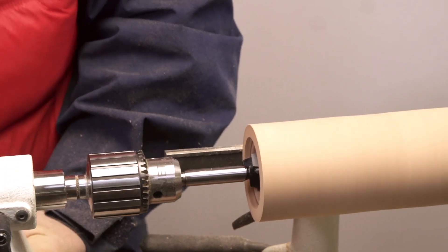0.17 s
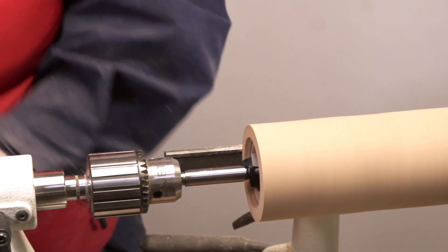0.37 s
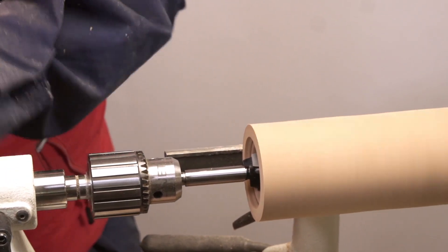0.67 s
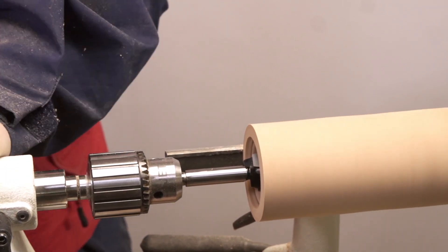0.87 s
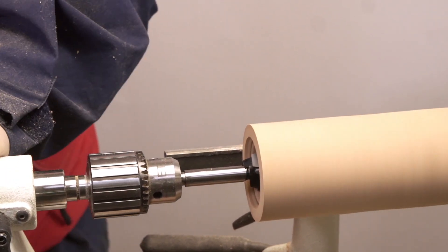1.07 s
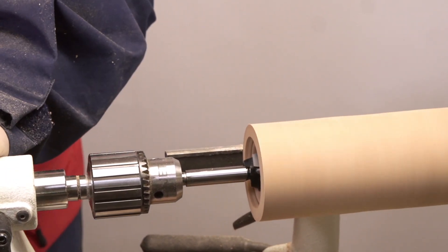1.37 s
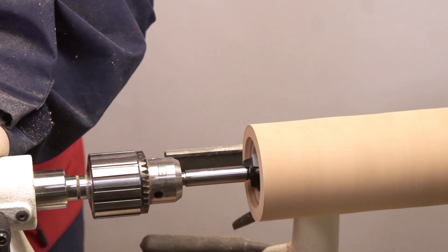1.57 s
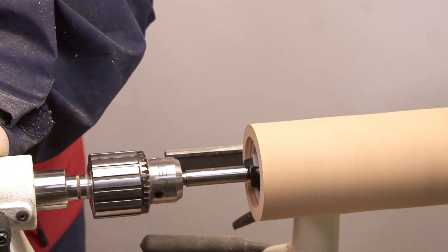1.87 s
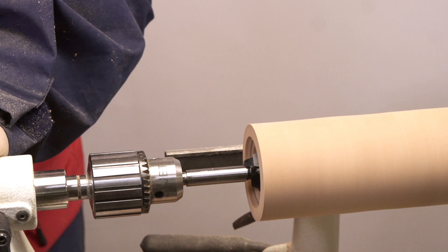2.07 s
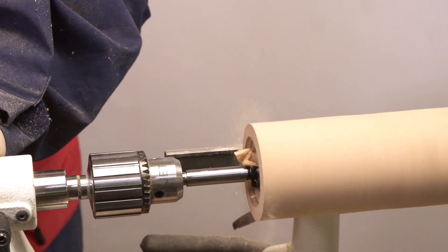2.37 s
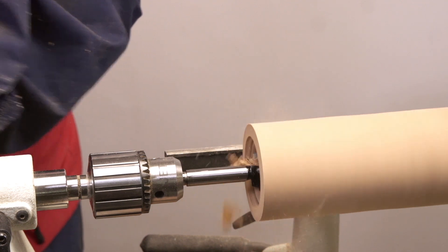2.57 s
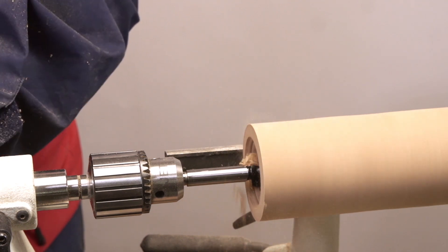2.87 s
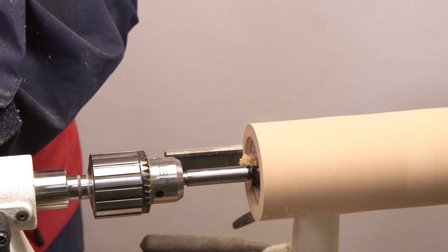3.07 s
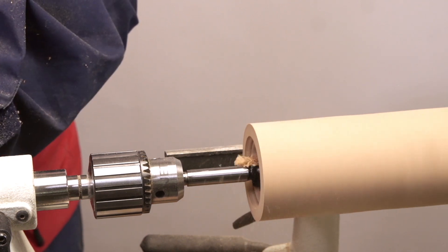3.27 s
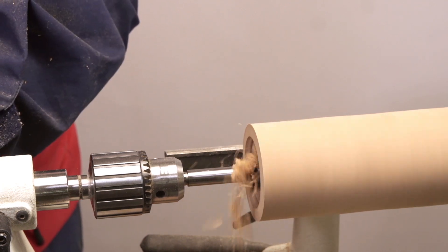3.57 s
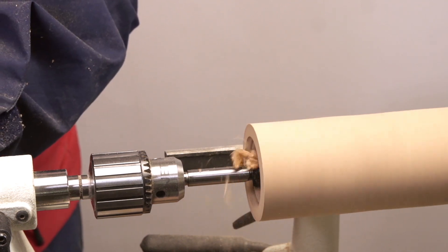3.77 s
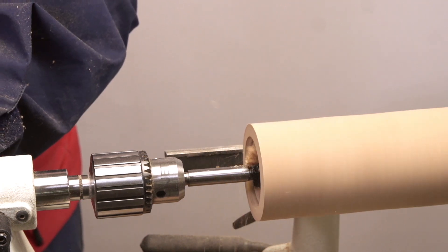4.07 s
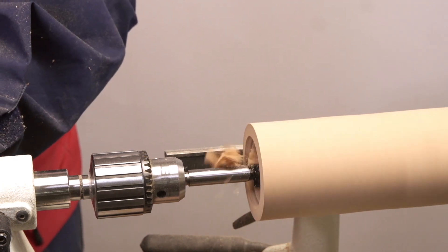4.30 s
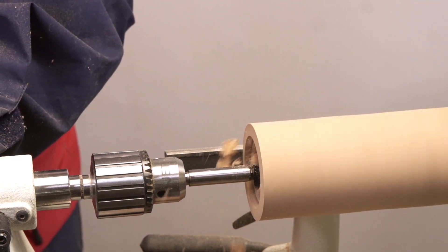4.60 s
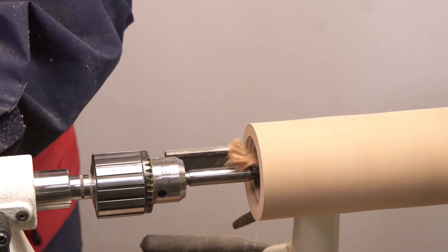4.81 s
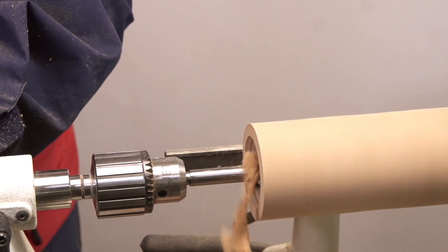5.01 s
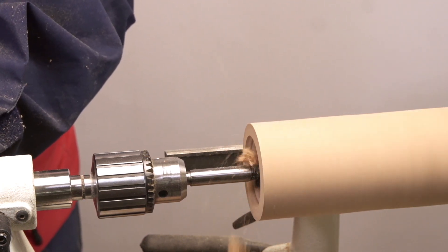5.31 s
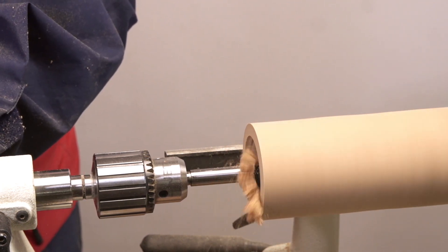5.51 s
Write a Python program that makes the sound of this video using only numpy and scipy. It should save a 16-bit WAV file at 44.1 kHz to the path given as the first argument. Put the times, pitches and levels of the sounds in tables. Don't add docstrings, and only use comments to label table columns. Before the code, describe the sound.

In a workshop, close up and dry, a lathe abruptly appears, idling with a faint pulsing hiss and low shake. Light knocks and a quick sleeve rub follow. Then a boring bit grazes the spinning wood in irregular steely ticks and scrapes, growing denser. It bites: a loud harsh whine, wooden rumble, snapping fibres and squeaks repeat with each turn, until the wood sings and groans. The camera microphone gives clipped highs.

```python
import sys
import numpy as np
from scipy import signal
from scipy.io import wavfile
from scipy.ndimage import uniform_filter1d, map_coordinates

SR = 44100
rng = np.random.default_rng(int(sys.argv[2]) if len(sys.argv) > 2 else 0)


def materialize(psi):
    bounded = np.clip(np.atleast_2d(psi).T, -1, 1)
    quanta = np.round(bounded * 32767).astype(np.int16)
    wavfile.write(sys.argv[1], SR, quanta)


def undo_db(level):
    steps = np.asarray(level, float) / 20
    return 10 ** steps


N = 249165
T = np.arange(N) / SR
HZ = np.fft.rfftfreq(N, 1 / SR)


def evened(x):
    return x / np.sqrt(np.mean(x ** 2) + 1e-20)


def steady(x, size=6000):
    power = uniform_filter1d(uniform_filter1d(x ** 2, size), size)
    return x / np.sqrt(abs(power) + 1e-20)


def columns(rows):
    s, *rest = np.transpose(rows)
    return [np.interp(T, s, c, left=-120) for c in rest]


def colour(points):
    hz, db = np.transpose(points)
    return undo_db(np.interp(np.log(HZ + 1), np.log(hz), db, left=-100, right=-100))


def modes(rows):
    response = 0
    for k, (hz, width, db) in enumerate(sorted(rows)):
        response = response + (-1) ** k * undo_db(db) / (1 + 2j * (HZ - hz) / width)
    return response


def through(x, gain):
    return np.fft.irfft(np.fft.rfft(x) * gain, N)


# (time [s], speed [turns/s])
SPINDLE_SPEED = [(0, 16.85), (1.55, 16.85), (1.7, 15.8), (2.1, 15.2), (2.4, 14.65), (2.8, 14.75),
                 (3.2, 14.9), (3.6, 15.1), (3.85, 15.15), (3.95, 15.55), (4.35, 15.55), (4.55, 15.15),
                 (4.9, 15.03), (5.7, 15.0)]


def angle():
    return np.cumsum(columns(SPINDLE_SPEED)[0]) / SR


def grain(memory, size):
    turns, keep = angle(), np.clip(memory, 0, .98)
    fresh = rng.standard_normal((100, size))
    marks = signal.lfilter([np.sqrt(1 - keep ** 2)], [1, -keep], fresh, axis=0)
    return map_coordinates(marks.ravel(), [(turns + 5) * size], order=1)


def chips(per_s, spread_db):
    size = undo_db(spread_db * np.minimum(rng.exponential(1, N), 5))
    happens = rng.random(N) < per_s / SR
    return evened(size * rng.standard_normal(N) * happens)


# (time [s], level [dB])
MOTOR_SHAKE = [(.31, -54.5), (1.3, -56.5), (2.44, -57), (2.52, -72), (3.4, -66), (4.28, -52), (4.95, -54.5),
               (5.18, -54), (5.65, -64)]
# (times per turn, level [dB], share of the swell)
SPINDLE_HUMS = [(9, -56.5, 0.69), (11, -66, .3), (12, -64.5, 0.34)]
# (time [s], level [dB])
HUM_SWELL = [(1.7, -18), (1.98, 16.5), (2.28, -14), (2.57, 3), (3.3, -6), (4.0, -1), (4.75, 0), (5.65, -21)]


def drive_hum():
    waver, flutter = (evened(uniform_filter1d(uniform_filter1d(v, size=2000), size=2000))
                      for v in rng.standard_normal((2, N)))
    shake_phase = 2 * np.pi * np.cumsum(46.4 + 0.43 * waver) / SR
    shake = undo_db(columns(MOTOR_SHAKE)[0] + 0.63 * flutter) * np.sin(shake_phase)
    swell_db = columns(HUM_SWELL)[0]
    hum = sum(undo_db(db + share * swell_db - flutter) * np.sin(2 * np.pi * k * angle())
              for k, db, share in SPINDLE_HUMS)
    return np.sqrt(2) * (shake + hum)


# (frequency [Hz], level [dB])
IDLE_COLOUR = [(35, -43), (60, -7.5), (202, -15), (798, -9), (1130, -18.5), (1360, -16), (1530, -20),
               (1980, -13), (3550, -22.5), (5150, -10.5), (6070, -16.5), (9670, -17.5), (15800, -23.5)]
# (frequency [Hz], width [Hz], level [dB])
IDLE_RINGING = [(840, 110, -37), (1380, 87, 2), (2086, 52, 0.5), (4740, 21, -0.5), (5000, 24, -14),
                (5550, 42, -7), (6600, 220, -9), (6950, 33, -8), (8700, 50, -7), (9500, 72, 2),
                (10140, 120, 3), (10180, 130, 1), (11400, 66, -24), (13200, 190, -17)]


def idle():
    turn = 2 * np.pi * angle()
    pulse_db = 1.9 * np.cos(2 * turn + 0.48) + 0.6 * np.cos(4 * turn + 1.3) + .5 * np.cos(turn + .2)
    drive = 1.0 * grain(0.73, size=2600) + rng.standard_normal(N) * undo_db(pulse_db)
    machine = colour(IDLE_COLOUR) * (1 + undo_db(5.5) * abs(modes(IDLE_RINGING)))
    hiss = evened(through(drive, machine))
    unbalance = undo_db(-63) * np.sin(turn)
    return undo_db(-49) * hiss + drive_hum() + unbalance


# (time [s], peak level [dB], pitch factor)
KNOCK_TIMES = [
    (.3045, -60, 0.79),
    (.3115, -44.5, 1.16),
    (0.617, -37.5, 1.01),
    (.6208, -43, 1.23),
    (.631, -42, 0.98),
    (.639, -55, 0.72),
    (.667, -51, 0.67),
    (.674, -36, 0.65),
    (.681, -31.5, 0.93),
]
# (frequency [Hz], level [dB], time to fall 60 dB [s])
KNOCK_RINGING = [(710, 0, .05), (1150, -2, .03), (1420, -4, .025)]


def knocks():
    out = np.zeros(N)
    for s, peak_db, pitch in KNOCK_TIMES:
        t = np.clip(T[:SR] - s, 0, .2)
        ring = sum(undo_db(db - 60 * t / t60) * np.sin(2 * np.pi * pitch * hz * t) for hz, db, t60 in KNOCK_RINGING)
        out[:SR] += undo_db(peak_db) * ring
    return out


# (time of crest [s], dull level [dB], bright level [dB], rise [s/10 dB], fall [s/10 dB])
SLEEVE_STROKES = [
    (.308, -55, -52, .003, .008),
    (.496, -57, -47.5, 0.18, 0.07),
    (.62, -51, -57, .003, .012),
    (.665, -41, -38, 0.0063, .03),
    (.69, -35.5, -35, 0.017, 0.038),
    (.74, -47, -44.5, 0.054, 0.088),
    (.96, -72, -51, .06, 0.023),
]
# (frequency [Hz], level [dB])
DULL_CLOTH = [(110, -46), (180, -29), (243, -7.5), (698, -8), (1120, -6.5), (1210, -13), (1560, -6),
              (2800, -23), (3640, -43), (6160, -120)]
# (frequency [Hz], level [dB])
BRIGHT_CLOTH = [(1290, -38), (2200, -16), (3950, -6.5), (4580, -7.5), (6700, -2), (7960, -5.5),
                (11800, -7.5), (15800, -14)]


def sleeve():
    dull_power, bright_power = np.zeros(N), np.zeros(N)
    for crest, dull_db, bright_db, rise, fall in SLEEVE_STROKES:
        shape = undo_db(-10 * np.maximum((crest - T) / rise, (T - crest) / fall))
        dull_power += (undo_db(dull_db) * shape) ** 2
        bright_power += (undo_db(bright_db) * shape) ** 2
    weave_db = 1.0 * evened(uniform_filter1d(rng.standard_normal(N), size=130))
    rub = rng.standard_normal(N) * undo_db(weave_db)
    dull, bright = (evened(through(rub, colour(c))) for c in (DULL_CLOTH, BRIGHT_CLOTH))
    return np.sqrt(dull_power) * dull + np.sqrt(bright_power) * bright


# (times per turn, depth [dB], place [turns])
EDGE_BITE = [(1, .7, .55), (2, .6, .02), (3, .8, .15), (4, 1.2, .04), (6, .7, .06), (8, .6, .04)]


def bite_db():
    turns = angle()
    return sum(db * np.cos(2 * np.pi * k * (turns - place)) for k, db, place in EDGE_BITE)


# (start [s], end [s], first pitch [Hz], last pitch [Hz], level [dB])
CHATTER_TONES = [(2.22, 2.58, 733, 728, -33.5), (2.23, 2.6, 676, 670, -39), (3.86, 4.4, 541, 538, -47),
                 (2.5, 3.45, 720, 733, -39), (2.4, 2.9, 765, 765, -39), (2.65, 3.25, 938, 956, -43),
                 (3.5, 3.85, 822, 835, -39), (2.24, 2.48, 924, 917, -36.5), (3.92, 4.38, 919, 907, -37),
                 (3.86, 4.56, 836, 823, -34), (4.38, 5.6, 826, 820, -30.5), (4.5, 5.58, 785, 790, -39),
                 (4.45, 5.5, 735, 730, -40), (4.55, 5.55, 875, 887, -35.5), (4.33, 4.95, 533, 529, -37),
                 (4.8, 5.6, 529, 526, -39.5), (2.85, 3.5, 428, 420, -44), (2.28, 2.45, 415, 410, -40),
                 (3.45, 3.9, 875, 885, -40), (4.36, 4.5, 420, 400, -40), (3.92, 4.98, 606, 604, -42),
                 (5.04, 5.5, 602, 606, -46), (5.52, 5.65, 607, 608, -37), (3.93, 4.36, 385, 388, -42),
                 (.35, 1.75, 810, 806.5, -63.5), (.8, 1.68, 5098, 5111, -59), (1.0, 1.62, 7016, 7015, -69)]
# (time [s], pitch [Hz], level [dB])
BLANK_SONG = [(2.75, 662, -46), (2.95, 664, -37.5), (3.4, 669, -33.5), (3.55, 680, -38.5), (3.68, 706, -39),
              (3.79, 719, -31), (3.87, 728, -37), (3.96, 724, -28.5), (4.35, 726, -25), (4.42, 718, -38)]


def chatter(waver_hz=2.5, flutter_db=1.5):
    tones = [[(a, first, db), (b, last, db)] for a, b, first, last, db in CHATTER_TONES] + [BLANK_SONG]
    out, turns = np.zeros(N), angle()
    for rows in tones:
        s, hz, db = np.transpose(rows)
        a, b = int(s[0] * SR), min(int(s[-1] * SR), N)
        t = T[a:b]
        wobble, flutter = (evened(uniform_filter1d(v, size=1800)) for v in rng.standard_normal((2, b - a)))
        lurches = rows is not BLANK_SONG and s[0] > 2 and hz[0] > 650
        lurch = np.cos(2 * np.pi * (turns[a:b] + rng.random())) * lurches
        pitch = np.interp(t, s, hz) + waver_hz * wobble + 14.8 * lurch
        level_db = np.interp(t, s, db) + 1.2 * lurch + flutter_db * flutter / np.sqrt(len(rows) / 2)
        swell_s = min(0.12 * (s[-1] - s[0]), .2)
        fade = np.clip(np.minimum(t - s[0], s[-1] - t) / swell_s, 0, 1)
        out[a:b] += np.sqrt(2) * undo_db(level_db) * fade * np.sin(2 * np.pi * np.cumsum(pitch) / SR)
    return out * undo_db(0.31 * bite_db())


# (time [s], steel level [dB], wood level [dB], contact [s])
GRAZE_TIMES = [(1.632, -42.5, -54, 0.0055), (1.641, -33.5, -44, 0.0025), (1.698, -39, -40, 0.031),
               (1.706, -40.5, -41, .01), (1.722, -37.5, -54, .01), (1.765, -34, -47, 0.0059),
               (1.785, -41, -48, .012), (1.803, -42, -49, .003), (1.819, -40, -42, .003),
               (1.83, -29.5, -38.5, 0.036), (1.884, -27, -37, 0.0034), (1.908, -24, -41, 0.003),
               (2.112, -33, -43, .01), (2.222, -34, -40, 0.0085), (1.900, -26, -32.5, 0.021),
               (1.934, -29, -29.5, 0.0043), (1.952, -27.5, -34.5, 0.037), (1.995, -34, -36, 0.016),
               (2.016, -27.5, -33, 0.042), (2.071, -32, -36.5, 0.02), (2.088, -29.5, -36.5, 0.035),
               (2.135, -37, -40, 0.012), (2.155, -31, -38, 0.016), (2.176, -25, -30.5, 0.0022),
               (2.186, -35, -36, 0.01), (2.210, -26, -39, 0.0087), (2.232, -26.5, -39, 0.007)]


def grazing(column, rise, fall, late):
    power = np.zeros(N)
    for row in GRAZE_TIMES:
        s, contact = row[0], row[3]
        at = round(s * SR)
        t = T[at:at + SR // 5] - s - late * contact
        let_go = fall * min(0.56 + contact / 0.016, 1)
        shape = np.clip(t / rise, 0, 1) * np.exp(-np.maximum(t - contact, 0) / let_go)
        power[at:at + SR // 5] += (undo_db(row[column]) * shape) ** 2
    return np.sqrt(power)


def first_contact(db=8.0):
    ticks = np.zeros(N)
    for row in GRAZE_TIMES:
        ticks[round(row[0] * SR) + 8] = undo_db(row[1] + db)
    return ticks


# (frequency [Hz], width [Hz], level [dB])
TOUCHED_STEEL = [(2807, 190, -1), (2995, 160, 4.5), (3240, 240, -7), (3850, 95, -43), (4060, 70, -14),
                 (4570, 31, -30), (5305, 130, 0), (5600, 240, -10), (6030, 105, 3), (6440, 200, -8),
                 (7070, 370, -3.5), (8070, 320, -18), (9320, 510, -7)]
# (frequency [Hz], width [Hz], level [dB])
TOUCHED_WOOD = [(140, 64, -13), (202, 43, -10), (293.5, 22, 2), (421, 23, -0.5), (537, 61, -5.5),
                (746, 39, 0), (900, 120, -7.5), (1350, 560, -15)]


def touches():
    steel_modes, wood_modes = modes(TOUCHED_STEEL), modes(TOUCHED_WOOD)
    steel_force = chips(7000, 2.0) * grazing(column=1, rise=0.00032, fall=0.012, late=0) + first_contact()
    wood_force = chips(4000, 3.9) * grazing(column=2, rise=0.0025, fall=0.017, late=0.14)
    ring = through(steel_force, steel_modes) / np.linalg.norm(steel_modes)
    knock = through(wood_force, wood_modes) / np.linalg.norm(wood_modes)
    return undo_db(-4.0) * np.sqrt(N) * (ring + undo_db(0.6) * knock)


# (frequency [Hz], width [Hz], level [dB])
SCRATCH_RINGING = [(11000, 1600, 0), (12880, 160, 6), (14200, 2200, 1)]


def scratch(db=-13.5, effort=1.4):
    gain = grazing(column=1, rise=.0003, fall=0.0089, late=0) / undo_db(-27)
    top = modes(SCRATCH_RINGING)
    grit = through(chips(2300, 2.9) * gain ** effort, top)
    return undo_db(db - 29.5) * np.sqrt(N) * grit / np.linalg.norm(top)


# (time [s], peak level [dB])
SNAP_TIMES = [(2.214, -21), (2.2313, -6.5), (2.257, -12), (2.2732, -24), (2.4104, -13), (2.434, -21),
              (2.4783, -13), (2.5466, -11), (2.689, -14), (2.7346, -10), (3.1537, -17), (3.2206, -14),
              (3.3875, -13), (3.4154, -12), (3.49, -14), (3.5546, -8), (3.7238, -13), (3.7424, -9),
              (3.7886, -10), (3.884, -9), (3.912, -14), (4.2787, -21), (4.3468, -12), (4.363, -18),
              (4.4106, -18), (4.4782, -27), (4.5435, -13), (4.6104, -23), (4.6932, -23), (4.7426, -15),
              (4.775, -18), (4.8396, -10), (4.953, -7), (5.0434, -19), (5.1716, -12), (5.304, -12),
              (5.3248, -11), (5.447, -17), (5.504, -8), (5.6018, -11)]
# (frequency [Hz], level [dB])
TORN_WOOD = [(41, -57), (70, -29.5), (217, -18.5), (306, -8), (526, -11.5), (723, -3), (2150, -17.5),
             (3020, -9), (3780, -24.5), (6090, -9), (7990, -21), (9580, -25), (15800, -26)]


def snaps(fall=0.002):
    gain = np.zeros(N)
    tail = np.exp(-np.arange(400) / SR / fall)
    for s, db in SNAP_TIMES:
        gain[round(s * SR):][:400] += undo_db(db) * tail
    bright = colour(TORN_WOOD) * (HZ / 3000) ** .15
    gain *= undo_db(-10)
    return through(gain * rng.standard_normal(N), bright / np.sqrt(np.mean(bright ** 2)))


# (time [s], feed pressure [dB], rub of its sides [dB])
CUT_FORCES = [(2.18, -6, 6.5), (2.31, 3.5, 1), (2.45, 1, 3), (3.13, -2.5, 4), (3.5, -2.5, 3.5),
              (3.7, 0, 2.5), (3.86, -5, 4), (3.93, 5, -2), (3.98, 1.5, -0.5), (4.33, 3, -4),
              (4.43, 5, -2.5), (5.0, 4.5, -1.5), (5.48, 4.5, -2.5), (5.56, -0.5, 3), (5.61, 3.5, 1.5),
              (5.65, 0, 2)]
# (level [dB], share of feed, share of rub, extra on entry [dB])
CUT_LAYERS = dict(bed=(-38.5, 1.08, -0.36, -5), middle=(-48.5, 2, 0, 2), blank=(-35, -0.27, -1, 3.5),
              upper=(-33, 0.57, -0.85, 1.5), first=(-31, -0.1, 0.4, -5), modes=(-34, 0.43, 0.85, -3),
              high=(-36, 0.74, 1.42, -3.5), top=(-43, 1, 2.5, -11.5), second=(-38, -0.35, 0.75, -2),
              tear=(-33.5, 0.5153, 0.53, 1.5), edge=(-42.5, 0.4, 1.22, -0.7), shrill=(-47, 0, 1.3, -2),
              flank=(-47.5, -0.8, 1.67, -9))


def level(name):
    feed, rub = columns(CUT_FORCES)
    db, by_feed, by_rub, entry_db = CUT_LAYERS[name]
    since = np.maximum(T - 2.224, 0)
    cut_db = db + by_feed * np.maximum(feed, -20) + by_rub * np.maximum(rub, -20)
    cut_db = cut_db + entry_db * np.exp(-since / 0.74)
    return undo_db(cut_db) * np.clip(since / 0.015, 0, 1)


HOLE_STAGES = (2.55, 3.35, 4.2, 5.0)


def staged(values):
    return np.interp(T, HOLE_STAGES, values)


# (start [s], rate [1/s], depth [dB], time of one crest [s])
BED_THROB = (4.38, 7.25, 5, 4.872)


def throb():
    start, per_s, depth_db, crest = BED_THROB
    begun, phase = T > start, 2 * np.pi * per_s * (T - crest)
    return begun, phase, depth_db * begun * (np.cos(phase) - .4)


# (frequency [Hz], width [Hz], level [dB])
BED_RINGING = [(182, 38, -15), (243, 58, -11), (302, 28, 3), (345, 26, 3), (424, 32, -.5)]
# (frequency [Hz], width [Hz], level [dB])
MIDDLE_RINGING = [(517, 8.6, -12), (592, 6, -0.5), (539, 61, 0)]
# (frequency [Hz], width [Hz], level [dB])
UPPER_RINGING = [(812, 66.5, 0.5), (889.5, 53, -1), (924, 19, -3), (789.2, 45.6, 1.5), (739, 31, -6)]
BED_CHANGE = (.1, -1.5, -0.6, -3)
UPPER_CHANGE = (.1, .1, -3, -9)


def wood():
    force = grain(.85, size=800) * undo_db(.5 * bite_db() + .6 * grain(0.9, size=24))
    bed, middle, upper = (steady(through(force, modes(m))) for m in (BED_RINGING, MIDDLE_RINGING, UPPER_RINGING))
    turn = np.exp(2j * np.pi * 759 * T)
    r = np.exp(-np.pi * 45.0 / SR)
    blank = steady((turn * signal.lfilter([1 - r], [1, -r], force / turn)).real)
    upper_db = staged(UPPER_CHANGE)
    _, _, throb_db = throb()
    out = level("middle") * middle
    out = out + level("blank") * undo_db(upper_db / 2) * blank
    out = out + level("upper") * undo_db(upper_db) * upper
    return out + level("bed") * undo_db(throb_db + staged(BED_CHANGE)) * bed


# (frequency [Hz], share of the ring, waver [Hz])
BIT_WHINES = dict(first=(3005, .5, 45), second=(4595, .7, 22), edge=(5220, .5, 18), modes=(6065, .6, 22),
              shrill=(12865, .25, 50))


def whine(name):
    if name not in BIT_WHINES:
        return 0
    hz, share, waver_hz = BIT_WHINES[name]
    waver = evened(uniform_filter1d(uniform_filter1d(rng.standard_normal(N), size=300), size=300))
    return share * np.sqrt(2) * np.sin(2 * np.pi * np.cumsum(hz + waver_hz * waver) / SR)


# (frequency [Hz], width [Hz], level [dB])
BIT_RINGING = dict(first=[(3005, 110, 0), (2880, 200, -6), (3170, 160, -14)], second=[(4595, 70, 0),
               (4700, 200, -12)], edge=[(5220, 60, 0), (5480, 220, -6)], modes=[(6065, 70, 0),
               (5900, 200, -8), (6850, 200, -8), (7250, 250, -7)], high=[(9270, 200, 0), (9550, 300, 0),
               (9780, 150, -1), (10300, 500, -12)], flank=[(3660, 110, 0), (4070, 150, -4), (6810, 70, 0),
               (8150, 300, -8)], shrill=[(12865, 90, 0), (12690, 260, -8)], top=[(11000, 2000, 0),
               (14000, 1800, 1)])
# (times per turn, place [turns], then depth [dB] at each stage)
BIT_FEEL = dict(first=[(1, .5, .3, 2.0, .4, 0), (2, .03, 1.2, 2.6, 1.4, 0), (2, .25, 0, 0, 0, 1),
            (4, .04, 1.2, .9, 1, 0), (4, .11, 0, 0, .8, 2.4)], second=[(1, .9, 0, 1.6, 0, 1.6),
            (2, .45, 1.6, .8, 0, 0), (2, .07, 0, 0, 0, 1.4), (4, .03, .7, 1.2, 0, .9)],
            edge=[(2, 0, 4.5, 4.5, 0, 0), (4, 0, 2, 2.6, 0, 0), (2, .06, 0, 0, 3, 4),
            (4, .06, 0, 0, 1.2, 2.8), (1, .47, 0, 2, .7, 1.5)], modes=[(1, .93, 0, 1.9, 1.8, 1.1),
            (2, .37, 3, 3.8, 0, 1.2), (2, .29, 0, 0, 1.8, 1.6)], high=[(1, .18, 0, 0, 1.3, 1),
            (2, .37, 1, 1.2, 0, 0), (2, .15, 0, 0, 1.2, .8), (3, .14, 1.7, 1.5, 1, .7)],
            flank=[(1, .3, 1, 3, 2, 1), (2, .3, 1, 1.5, 1, 1)], shrill=[(1, .5, 1.5, 1.5, 1, 1),
            (2, .33, 1.5, 1.5, 1, 1)], top=[(1, .55, 1, 1.2, 0, .5), (2, .3, .8, 1.2, 0, .5),
            (3, .12, 1.1, .9, .8, .4)])
BIT_CHANGE = dict(first=(0.1, .1, 0.14, 0.085), second=(.1, .1, .1, 0.091), edge=(1.8, -0.2, -1.7, .1),
              modes=(.1, .1, .1, .1), high=(0.11, .6, .1, .1), shrill=(-3, 1, 1, -1), top=(.1, 1.5, .1, .1),
              flank=(.1, 1.5, .1, .1))
# (start [s], rise [s], level [dB])
SHAVINGS_PLUG = (5.1, .03, 3.7)


def steel():
    turns, out = angle(), 0
    force = .7 * chips(9000, 1.94) + 1.3 * grain(.88, size=2900) * undo_db(2.5 * grain(.7, size=700))
    plug_start, plug_rise, plug_level = SHAVINGS_PLUG
    for name, group in BIT_RINGING.items():
        beat_db = sum(staged(depth) * np.cos(2 * np.pi * k * (turns - place))
                      for k, place, *depth in BIT_FEEL[name])
        spots_db = .9 * grain(.8, size=60)
        plug_db = (name == "top") * plug_level * np.clip((T - plug_start) / plug_rise, 0, 1)
        ring = steady(through(force * undo_db(spots_db), modes(group))) + whine(name)
        ring = undo_db(plug_db) * steady(ring * undo_db(1.3 * beat_db))
        out = out + level(name) * undo_db(staged(BIT_CHANGE[name])) * ring
    return out


# (frequency [Hz], width [Hz], level [dB])
TEAR_PEAKS = [(1097, 7.6, 0.92), (1258, 73, 4.6), (1431, 66, 6.1), (1760, 66, 4.5), (1984, 79, 5),
              (3680, 210, 6.5), (4106, 136, 9)]


def tearing():
    crackle = .6 * chips(5000, 1.25) + grain(0.9, size=2900) * undo_db(4 * grain(.9, size=700))
    force = crackle * undo_db(0.68 * bite_db())
    peaks = 1 + sum(abs(modes([m])) ** 2 for m in TEAR_PEAKS)
    torn = steady(through(force, colour(TORN_WOOD) * np.sqrt(peaks)))
    return level("tear") * undo_db(3.5) * torn


# (first time [s], last time [s], first level [dB], last level [dB])
SQUEAK_RUNS = [
    (2.313, 2.4, -41, -26),
    (2.516, 3.1, -29, -35),
    (2.958, 4, -36, -43),
    (3.593, 4.1, -41, -37),
    (4.48, 3.1, -47, -41),
    (4.973, 4.9, -38, -38),
    (5.213, 5.205, -34, -28),
    (5.513, 5.516, -35, -31),
]


def squeaks(length=0.0092, hz=5215, spread_db=1.5):
    out, t, turns = np.zeros(N), np.arange(round(length * SR)) / SR, angle()
    tone = np.sin(np.pi * t / length) * np.sin(2 * np.pi * hz * t)
    for first, last, first_db, last_db in SQUEAK_RUNS:
        a, b = np.interp([first, last], T, turns)
        times = np.interp(np.arange(a, max(a, b) + .5), turns, T)
        for s, z in zip(times, rng.standard_normal(len(times))):
            db = np.interp(s, [first, last], [first_db, last_db]) + spread_db * z
            out[round((s - .003) * SR):][:len(t)] += undo_db(db - 3.0) * tone
    return out


# (time [s], peak level [dB], pull [s], push [s])
STAND_BUMPS = [
    (4.346, -33, .016, .030),
    (4.746, -27, .013, .024),
]


def bumps():
    out = np.zeros(N)
    for s, db, pull, push in STAND_BUMPS:
        out -= undo_db(db - 3) * np.sin(np.pi * np.clip((s - T) / pull, 0, 1))
        out += undo_db(db) * np.sin(np.pi * np.clip((T - s) / push, 0, 1) ** .6)
        t = np.maximum(T - s, 0)
        out += undo_db(db - 17 - 60 * t / 0.5) * np.sin(2 * np.pi * 72 * t)
    return out


# (pitch factor, level [dB])
GROAN_TONES = [(1, 0), (1.32, -7)]


def groan():
    begun, phase, throb_db = throb()
    pitch = 322 - 30 * np.sin(phase) + 2.52 * grain(0.5, size=6)
    tones = sum(undo_db(db) * np.sin(2 * np.pi * ratio * np.cumsum(pitch) / SR) for ratio, db in GROAN_TONES)
    return undo_db(-35 + 1.0 * throb_db + bite_db()) * begun * tones


def scene():
    before = idle() + knocks() + sleeve() + chatter()
    grazes = touches() + scratch()
    cut = snaps() + wood() + steel() + tearing() + squeaks()
    return (before + grazes + cut + bumps() + groan())[None]


def top_cut(x):
    return signal.sosfilt(signal.butter(12, 15930, fs=SR, output="sos"), x)


def record(dry):
    start_s = .3043
    notch = 1 - 0.72 / (1 + 2j * (HZ - 7860) / 330)
    edge = np.clip((15830 - HZ) / 100, 0, 1) ** 3
    heard = through(dry[0] * (T > start_s), notch * edge)
    heard = heard * np.clip((T - start_s) / .004 + 2, 0, 1)
    return top_cut(heard[None])


dry = scene()
out = record(dry)
materialize(out)
```